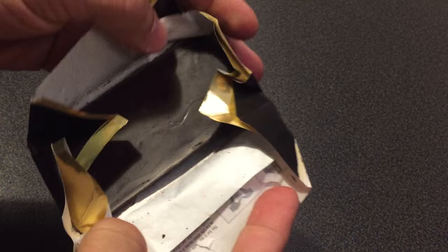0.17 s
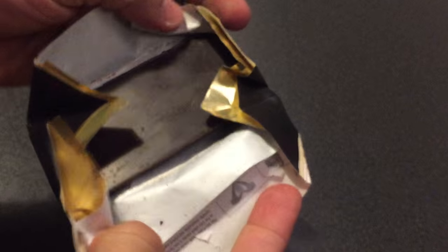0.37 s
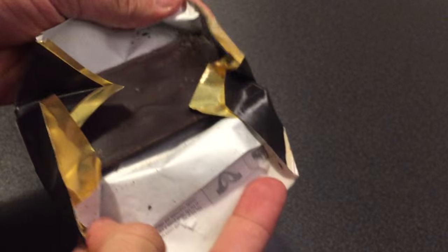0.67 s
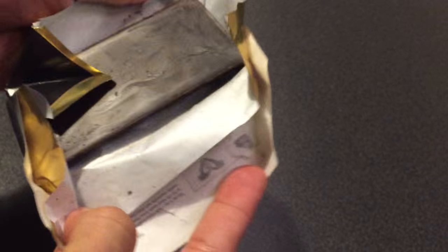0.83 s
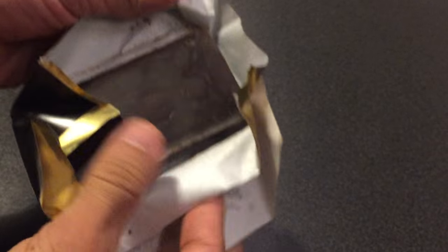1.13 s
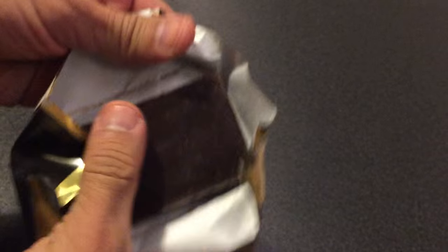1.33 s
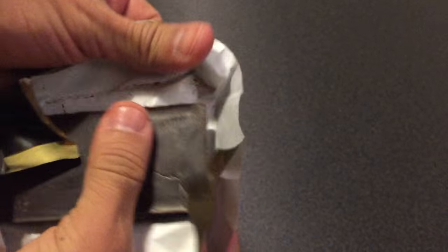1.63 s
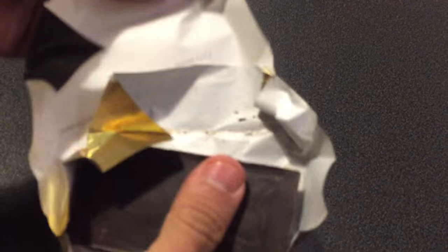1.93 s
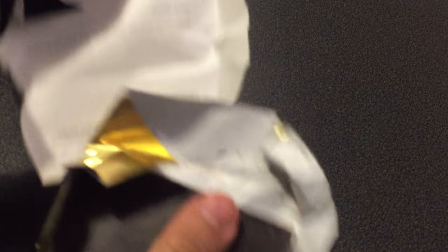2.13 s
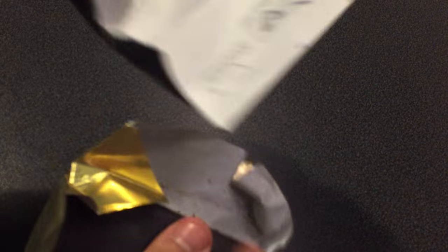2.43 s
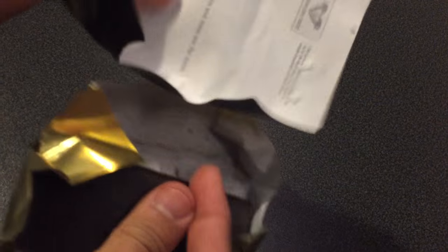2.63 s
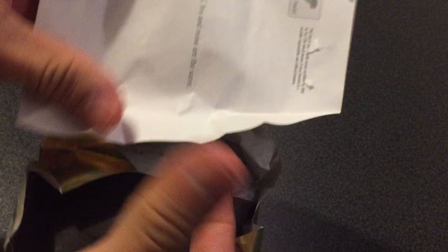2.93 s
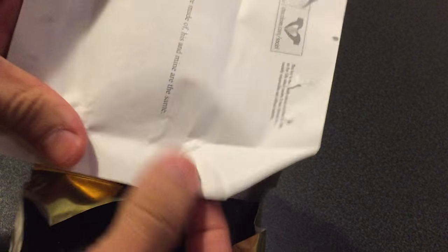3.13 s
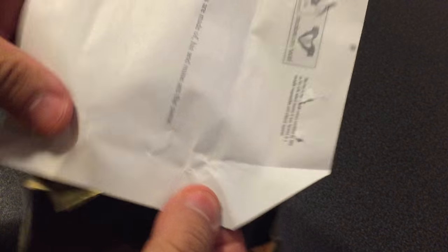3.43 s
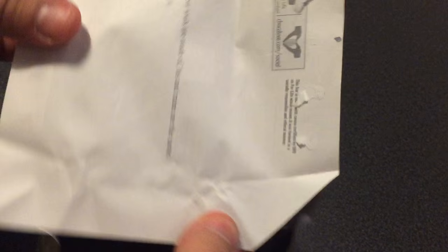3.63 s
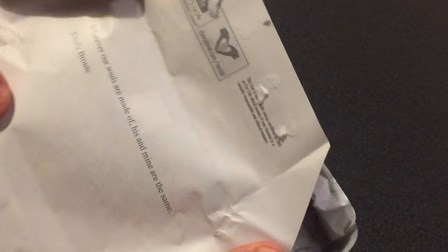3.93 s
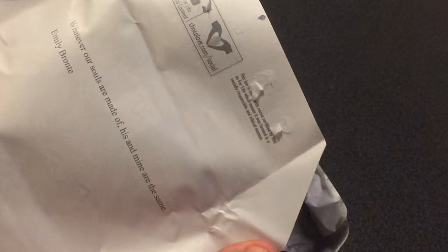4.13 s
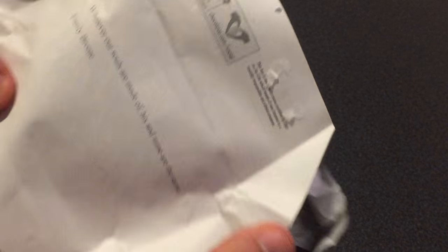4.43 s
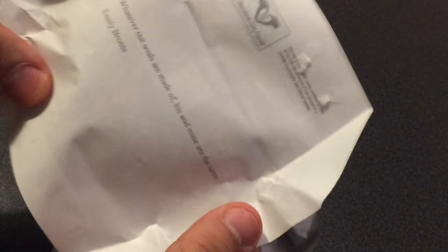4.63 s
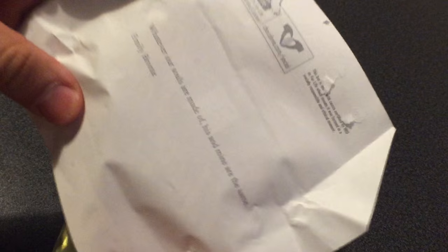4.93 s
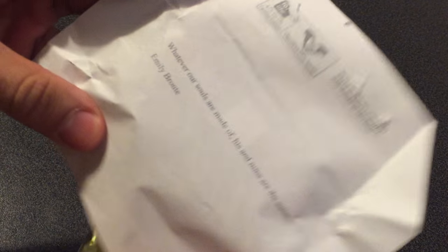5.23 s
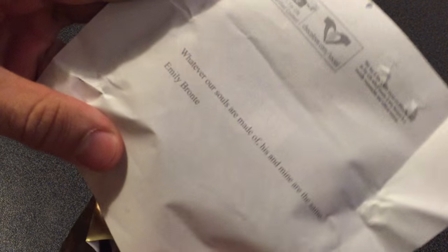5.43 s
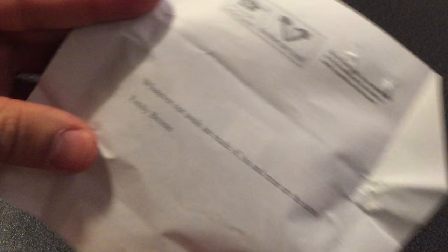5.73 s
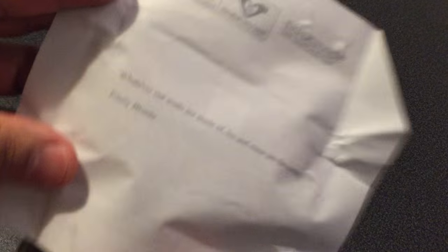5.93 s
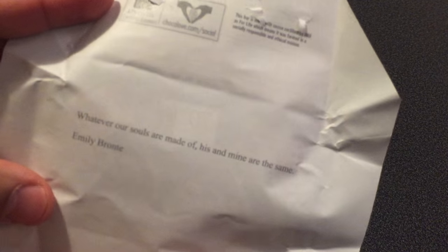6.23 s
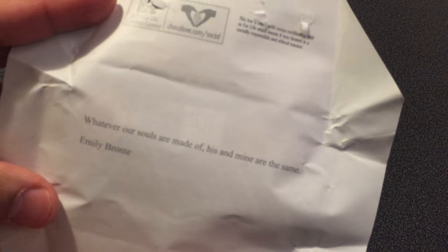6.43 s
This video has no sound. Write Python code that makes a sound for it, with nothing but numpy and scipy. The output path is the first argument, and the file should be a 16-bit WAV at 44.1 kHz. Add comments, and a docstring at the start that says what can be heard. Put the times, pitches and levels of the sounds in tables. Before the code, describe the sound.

Foil and paper wrapper crackles sharply and busily close up over a low appliance hum, which stops before the final sparse crinkles.

```python
"""Unwrapping a chocolate bar

Hands unfold a foil and paper wrapper close to a microphone in a small room. Buckling creases snap as
short band-passed noise bursts over a rustle of random cracks shaped by the strokes of the hands, and
the flapping sheet gives decaying low sines. An appliance hums, a wavering sine over filtered noise,
until it switches off; a low rumble then sinks away. Faint steady noise fills the room throughout."""
import sys
import numpy as np
from scipy import signal
from scipy.fft import rfft, irfft, next_fast_len
from scipy.io import wavfile

SR = 44100
rng = np.random.default_rng(int(sys.argv[2]) if len(sys.argv) > 2 else 0)


def pcm_store(signal):
    """Save signal as 16-bit PCM."""
    levels = np.round(np.clip(np.atleast_2d(signal), -1, 1) * 32767)
    wavfile.write(sys.argv[1], SR, levels.astype(np.int16).T)


N = 290619  # samples
OFF_S = 4.72  # the appliance is silent from here
EDGE_HZ = 15350  # upper limit of the treble

# creases that buckle: start_s, ring_peak_db, low_ring_hz, high_ring_hz, low_ring_db and high_ring_db
# (re the broad ring), treble_db (re the ring peak), t60_s
CREASE_SNAPS = [(0.022, -29.5, 1160, 2850, 4, -15, -8, 0.024), (0.051, -21, 1060, 3020, 4, 0, -21, 0.022),
                (0.096, -29, 1430, 2690, 11, 3, -9, 0.02), (0.114, -14.5, 1580, 3030, -15, -16, -2, 0.018),
                (0.164, -17, 1610, 2530, 0.5, -11, -4, 0.022), (0.213, -17.5, 1980, 3040, 7, 0, -34, 0.027),
                (0.238, -25.5, 1570, 2730, -23, -8, -14, 0.017),
                (0.244, -26, 1110, 2780, -2, -3, -16, 0.023), (0.273, -25, 1480, 2550, 5, 5, -14, 0.022),
                (0.281, -18, 1070, 2560, -5.5, -19, -28, 0.028),
                (0.352, -19.5, 1500, 3180, -8, -14, -2, 0.026), (0.38, -25, 1020, 2770, 1, -3, -23, 0.023),
                (0.426, -13, 1560, 3200, -4.5, -2, -19, 0.016),
                (0.476, -22.5, 1560, 6900, -34, 0, 5, 0.024),
                (0.504, -28.5, 1140, 5440, -17, -6, -18, 0.025),
                (0.586, -21.5, 2090, 3140, -9, -12, -18, 0.017), (0.621, -30, 1080, 2670, 8, 1, -19, 0.025),
                (0.747, -26.5, 1200, 2610, -7, -8, 10, 0.015),
                (0.754, -17.5, 1490, 4560, -19, -22, -23, 0.0086),
                (0.817, -15.5, 1670, 3440, -12, -18, -5, 0.016),
                (0.855, -10.5, 1430, 2530, -12, -21, -17, 0.018), (0.87, -12, 1280, 4010, 1, -8, -15, 0.02),
                (0.88, -14.5, 2280, 2410, 2, -4, -23, 0.025),
                (0.942, -9.5, 970, 4660, -7.5, -27, -5, 0.023),
                (0.956, -0.5, 1570, 6040, -23, -9, -1.5, 0.023),
                (1.007, -10.5, 1120, 5740, -12, -8, -2, 0.015),
                (1.076, -23.5, 680, 2970, -9.5, -7, -17, 0.031),
                (1.199, -14.5, 1450, 2530, 6, 6, -26, 0.024), (1.27, -33, 694, 4620, -10, -6, 10, 0.041),
                (1.295, -2, 750, 3950, -18.5, -10.5, -7, 0.022),
                (1.395, -13, 1090, 3300, 5.5, 2, -24, 0.04), (1.465, -26.5, 1190, 2990, 5, -17, -11, 0.025),
                (1.482, -19.5, 1410, 3230, 1, -10, -12, 0.029),
                (1.561, -26, 1570, 2550, -10, -1, -15, 0.026),
                (1.607, -26.5, 1350, 2420, 11, 0, -17, 0.024),
                (1.705, -24.5, 2240, 2320, -4, -12, -14, 0.031),
                (1.727, -14, 660, 2720, -10.5, -18, 0, 0.017), (1.757, -20, 1910, 2920, -6, -7, -9, 0.029),
                (1.778, -25, 2300, 2460, -6, -6, -17, 0.02), (1.807, -28, 1460, 3520, 1, -11, -18, 0.018),
                (1.837, -23, 1500, 5710, -16, -4, -16, 0.021),
                (1.859, -18.5, 1100, 2990, -8, -18, -17, 0.048),
                (1.91, -17.5, 2300, 2410, -9, -6, -12, 0.014), (1.932, -20, 1400, 3250, -7, -4, -16, 0.022),
                (2.016, -23, 2350, 2400, -8, -10, -20, 0.034), (2.103, -22.5, 1090, 2360, 6, 4, -19, 0.015),
                (2.11, -27, 1300, 2360, 2, -3, -19, 0.024), (2.156, -29, 1500, 4120, -12, 6, -13, 0.017),
                (2.27, -31, 1160, 2780, -1, -10, -17, 0.018), (2.295, -24, 1180, 2690, 2, 1, -16, 0.026),
                (2.327, -17, 1520, 2360, -10, -12, -18, 0.022),
                (2.349, -19.5, 1170, 2930, -7, -16, -19, 0.026), (2.397, -18, 1040, 3040, -7, -6, 1, 0.028),
                (2.477, -19.5, 1130, 3950, 0, 1, -13, 0.03), (2.562, -23.5, 1030, 2950, 4, -5, -9, 0.018),
                (2.574, -18, 1940, 2690, -6, -11, -14, 0.026), (2.583, -17, 1070, 2380, -7, -7, -12, 0.017),
                (2.618, -8.5, 1890, 4230, -13, -4.5, -22, 0.015),
                (2.651, -25, 2300, 3070, -1, -4, -17, 0.018), (2.672, -22, 1480, 2630, 5, 11, -14, 0.035),
                (2.696, -19.5, 970, 2460, -5.5, -4, -17, 0.018),
                (2.773, -16.5, 1480, 2310, 4.5, 0, -16, 0.01),
                (2.782, -19, 2270, 2390, -0.5, 3, -22, 0.016), (2.811, -16, 2130, 5070, -11, 2, -9, 0.013),
                (2.957, -15, 1830, 2850, -12, -12, -4, 0.022), (3.004, -29, 1810, 6150, 4, -2, -14, 0.025),
                (3.039, -25.5, 1080, 3730, -4, -6, -15, 0.034),
                (3.087, -14, 1030, 2500, -5.5, -12, -6, 0.025),
                (3.149, -29, 1120, 3900, -14, -6, -14, 0.02),
                (3.241, -18.5, 1740, 3200, -4, -6, -16, 0.014),
                (3.247, -15.5, 1100, 3240, -5.5, -14, -12, 0.016),
                (3.266, -8.5, 1090, 3140, -10, -35, -5, 0.013),
                (3.289, -20.5, 2100, 2330, 2, 6, -25, 0.016), (3.41, -11, 1750, 2900, 3.5, 1, -34, 0.023),
                (3.455, -22.5, 2130, 3080, 8.5, 6, -19, 0.025), (3.486, -32, 694, 2760, 8, -2, -21, 0.016),
                (3.519, -24, 1640, 2360, -9, -13, -7, 0.033),
                (3.556, -15, 1730, 3900, -6.5, -16, -2.5, 0.027),
                (3.587, -20, 2000, 3020, -1, -1, -5, 0.026), (3.613, -30, 1530, 5770, 10, -14, -18, 0.022),
                (3.779, -22.5, 1140, 2540, 5, -2, -12, 0.02), (3.804, -20.5, 1550, 2880, 4, 6, -13, 0.017),
                (3.832, -12, 1580, 2860, 3, -1, -14, 0.018), (3.849, -14.5, 720, 6100, -21, -1, 2.5, 0.015),
                (3.921, -11, 1950, 3250, -5, -15, -8, 0.02),
                (3.996, -9.5, 1550, 2560, -15.5, -11, -18, 0.024),
                (4.121, -27, 1070, 2830, 4, -2, -6, 0.06), (4.14, -0.5, 1770, 5000, -13, -5, -4.5, 0.015),
                (4.359, -41.5, 1990, 2690, 0, -17, -17, 0.02), (4.379, -47, 604, 2730, -6, -7, -5, 0.022),
                (4.424, -37.5, 970, 2350, 8, 0, -26, 0.023), (4.522, -33, 2000, 3300, 9, -6, -15, 0.017),
                (4.605, -36, 710, 2760, 5, 0, -23, 0.02), (4.638, -21, 1830, 2600, 6.5, -1, -15, 0.038),
                (4.68, -32, 1400, 6600, -11, -12, -9, 0.031),
                (4.693, -9.5, 1520, 2620, 5.5, -12, -19, 0.016),
                (4.761, -35.5, 1690, 2360, -4, 3, -20, 0.027),
                (4.916, -27.5, 1740, 2640, -8, 2, -25, 0.043),
                (4.953, -31.5, 2270, 2710, -7, 5, -17, 0.031),
                (4.981, -16.5, 1570, 3170, 6.5, 8, -20, 0.023),
                (5.0, -17.5, 840, 2840, 12, 7, -20.5, 0.025),
                (5.011, 5.5, 1850, 3630, -16.5, -8.5, -6, 0.014),
                (5.091, -25, 1040, 2470, 4, 2, -16, 0.013), (5.108, -24, 1940, 2590, 9, -3, -22, 0.018),
                (5.116, -27.5, 1950, 2700, 18, -4, -27, 0.029), (5.126, -36, 2000, 3980, 3, -4, -31, 0.023),
                (5.223, -31.5, 616, 2580, 5, 4, -22.5, 0.025), (5.28, -25, 610, 5060, -11, -1, 0, 0.016),
                (5.308, -28.5, 1700, 2670, -11, -3, -17.5, 0.029),
                (5.353, -33, 1570, 2870, -12, 2, -16, 0.025), (5.652, -38, 1770, 2410, 12, -10, -18, 0.037),
                (5.673, -29, 890, 2600, -2, -9, -14, 0.022), (5.687, -22, 587, 4560, -14, -3, -12, 0.022),
                (5.754, -25, 1730, 2630, -1, -8, -8, 0.022), (5.832, -40, 1450, 3500, -1, -4, -20, 0.029),
                (5.862, -40, 616, 2410, -4, -3, -21, 0.043), (5.871, -38, 1560, 2640, 6, -1, -19, 0.029),
                (5.928, -37, 1540, 2440, 3, -14, -13.5, 0.023), (6.041, -31, 685, 2470, 11, -6, -11, 0.035),
                (6.076, -12.5, 1940, 2780, 7, 9, -13, 0.016), (6.092, -10, 1780, 2570, -3, -7, -4.5, 0.012),
                (6.156, -10.5, 1610, 2130, 9.5, -13, -22, 0.019),
                (6.272, -36.5, 654, 2550, 5, 0, -26, 0.022),
                (6.285, -33.5, 1580, 2900, 2.5, -2, -19.5, 0.023),
                (6.317, -49, 596, 2550, 11, -4, -23.5, 0.016), (6.335, -45, 1360, 2640, 9, 1, -22.5, 0.017)]


def gain_of(db):
    """Decibel law: amplitude ratio of a level in dB."""
    return 10 ** (np.asarray(db) / 20)


def evened(x):
    """Power normalisation: scales to rms 1."""
    return x / np.sqrt(np.mean(x ** 2) + 1e-20)


def read(points, hz):
    """Interpolation over log frequency, on which hearing spaces pitch."""
    f, value = np.transpose(points)
    return np.interp(np.log(hz + 1), np.log(f + 1), value)


def add(mix, s, sound):
    """Superposition: adds a sound into the mix from s seconds on."""
    part = mix[round(s * SR):][:len(sound)]
    part += sound[:len(part)]


def coloured(x, spectrum):
    """Linear filtering: weights the frequencies of x by a table of gains, then sets rms 1."""
    size = next_fast_len(len(x))
    gain = gain_of(read(spectrum, np.fft.rfftfreq(size, 1 / SR)))
    return evened(irfft(rfft(x, size) * gain, size)[:len(x)])


def band(x, lo_hz, hi_hz):
    """Resonance as a causal band-pass, scaled to peak 1."""
    y = signal.lfilter(*signal.butter(2, [lo_hz, min(hi_hz, SR / 2 - 100)], "band", fs=SR), x)
    return y / abs(y).max()


def drift(cutoff_hz):
    """Low-passed noise: a slow random wander of rms 1."""
    return evened(signal.lfilter(*signal.butter(1, cutoff_hz, fs=SR), rng.standard_normal(N)))


def grains(per_s, spread_db, t60, clump_db):
    """Shot noise: tiny random cracks, a few of them large, arriving in clumps."""
    happens = rng.random(N) < per_s / SR
    size = gain_of(spread_db * np.minimum(rng.exponential(1, N), 5)) * happens
    clumped = size * gain_of(clump_db * drift(8.1))
    power_decay = gain_of(-2 * 60 * np.arange(600) / SR / t60)
    power = signal.oaconvolve(clumped ** 2, power_decay)[:N]
    return np.sqrt(abs(power)) * rng.standard_normal(N)


def creases():
    """Sums of incoherent cracks: those of the whole sheet, and of small patches each in its own band."""
    whole = grains(per_s=900, spread_db=3.8, t60=.007, clump_db=1.5)
    patches = np.zeros(N)
    for hz in 700 * 1.312 ** np.arange(9):
        cracks = grains(per_s=230, spread_db=3.0, t60=0.047, clump_db=3.0)
        patches += np.sqrt(hz) * evened(band(cracks, hz / 1.174, hz * 1.34))
    return evened(whole) + 0.92 * evened(patches)


def handling(offset_db, brightness_share, bending=0):
    """Power addition: one rustle layer's amplitude from the held sheet, strokes and crackle after snaps."""
    # strokes of the hands: strongest_s, level_db, brightness_db, extra_bending_db, rise_s, fall_s
    strokes = [(.01, -41, 4, -4, 0.063, 0.14), (.231, -42.5, 1, -3, 0.038, 0.11),
               (.38, -57, 1, 13, 0.053, 0.08), (.6, -49, 0.5, -12, 0.48, 0.31),
               (.78, -44.5, 4, -3.5, 0.094, 0.17), (0.871, -31, -7, 0, 0.12, 0.084),
               (1.05, -57.5, 5, 13, 0.078, 0.41), (1.208, -39, -19, 1, 0.029, 0.046),
               (1.375, -44.5, -3, 4, 0.084, 0.16), (1.473, -36, 0, -7, 0.2, 0.037),
               (1.622, -41, -2.5, -11, 0.26, 0.22), (1.925, -35, 6, -1, 0.25, 0.14),
               (2.027, -36.5, 5.5, 2, 0.083, 0.031), (2.12, -49.5, 6, 0, .06, 0.31),
               (2.276, -37, -2.5, 1.5, 0.51, .2), (2.356, -38.5, 5.5, 2, 0.087, 0.16),
               (2.478, -37.5, -4, 1, 0.073, 0.052), (2.584, -43, -0.5, -0.5, 0.1, 0.43),
               (2.792, -44, -1, 0, 0.16, 0.17), (2.957, -44.5, 1.5, 7.5, 0.064, 0.081),
               (3.095, -44.5, 7.5, 5, 0.21, 0.12), (3.172, -47, 4.5, 13, 0.044, 0.069),
               (3.29, -34.5, -7.5, 3, 0.084, 0.086), (3.43, -49, -18, 10, .02, .15),
               (3.571, -41, 3, 7.5, 0.087, 0.087), (3.834, -39.5, 0, 5.5, 0.32, 0.11),
               (4.01, -36.5, -23, 0, 0.03, 0.086), (4.13, -40.5, -10, 14.5, 0.046, 0.026),
               (4.432, -59, -8, 8, 0.11, 0.087), (4.526, -41.5, -18, -14, 0.033, 0.15),
               (4.55, -42, 0, -9, 0.042, 0.095), (4.62, -54, 2, 12.5, .07, 0.08),
               (4.7, -41, -11, -15, .015, 0.079), (4.729, -36.5, -1, 1, 0.069, 0.021),
               (4.78, -52.5, -19.5, -13, 0.054, .15), (4.89, -55.5, 1.5, -8, 0.17, .06),
               (4.96, -52, -2.5, -3, 0.053, .08), (5.12, -44, -12, -8, 0.053, 0.14),
               (5.316, -48, -1.5, 5.5, .12, 0.077), (5.392, -51.5, 6, 3, .1, 0.045),
               (5.705, -41.5, 3.5, 0, 0.096, 0.075), (5.755, -40.5, -3.5, 1.5, 0.076, 0.071),
               (5.966, -66, 11.5, 8, 0.054, 0.2), (6.085, -38.5, -8.5, -1.5, 0.057, .1),
               (6.443, -54.5, -19.5, -10, 0.4, 0.16)]
    # quiet rustle while the wrapper is only held: time_s, level_db, brightness_db
    held = [(0, -55, -22), (.7, -56, -10), (1.1, -56, 7), (1.26, -56.5, 5), (1.5, -48, 1), (2.4, -57.5, -5),
            (2.9, -59, 8), (3.22, -48, -15), (3.65, -50.5, -10), (4.05, -51, 3), (4.3, -81, -6),
            (4.5, -65, -4), (4.8, -60, -12), (5.001, -57, -4), (5.3, -64, -9), (5.45, -67.5, 1),
            (5.9, -62.5, -5), (6.3, -54, -21), (6.59, -76, -1)]
    drop_db, roundness = -30, 1.126  # level at both ends of a stroke; over 1 = a rounded top
    hold_bend_db, after_bend_db = 0.5, -2.5
    after_db, after_db_per_s, after_share = -35, -170, 0.34  # brighter after a bright snap

    t = np.arange(0, N + 64, 64) / SR
    held_s, held_db, held_bright_db = np.transpose(held)
    level = held_db + brightness_share * held_bright_db + bending * hold_bend_db
    power = gain_of(2 * np.interp(t, held_s, level))
    for s, db, bright_db, bend_db, rise, fall in strokes:
        away = np.where(t < s, (s - t) / rise, (t - s) / fall)
        level = db + brightness_share * bright_db + bending * bend_db + drop_db * away ** roundness
        power = power + gain_of(2 * level)
    for s, db, *_, treble_db, _ in CREASE_SNAPS:
        level = db + after_db + bending * after_bend_db + brightness_share * after_share * treble_db
        power = power + (t > s) * gain_of(2 * (level + after_db_per_s * abs(t - s)))
    return gain_of(offset_db) * np.interp(np.arange(N) / SR, t, np.sqrt(power))


def rustle():
    """Friction and buckling: creases crackle in paper and foil, skin slides in a finer hiss, the sheet bends."""
    # spectra of crackling paper, crackling foil, sliding skin and the bending sheet: freq_hz, gain_db
    paper = [(410, -35.5), (700, -2), (973, 2.5), (1200, 5), (1340, -2), (1530, 5), (1900, 0.5),
             (2320, -12), (2600, -4), (3380, -54), (5720, -120)]
    foil = [(1240, -51), (2100, -2), (2360, -4.5), (3170, 0.5), (3440, -2.5), (4540, -2.5), (4940, -10),
            (7000, -8), (9100, -24), (15400, -120)]
    skin_on_sheet = [(3240, -45), (5500, 0), (7650, -5.5), (8480, -0.5), (10500, -4.5), (11200, -4),
                     (14600, -6), (15500, -11.5)]
    bending_sheet = [(82, -21), (140, -5), (280, -7), (400, -13.5), (615, -6), (788, -9), (900, -17.5),
                     (1170, -31.5), (1980, -120)]

    cracks = creases()
    slide = grains(per_s=2500, spread_db=1.8, t60=.004, clump_db=3.0)
    bend = grains(per_s=700, spread_db=2.2, t60=.03, clump_db=1.8)
    paper_crackle = handling(0, 0) * coloured(cracks, paper)
    foil_crackle = handling(0.11, 0.6) * coloured(cracks, foil)
    skin = handling(-2.5, 0.97) * coloured(evened(slide) + 0.062 * cracks, skin_on_sheet)
    bends = handling(-6, -0.067, bending=0.91) * coloured(bend, bending_sheet)
    return paper_crackle + foil_crackle + skin + bends


def appliance():
    """Rotation and forced vibration: a wavering motor tone stops just before its casing's rumble."""
    # mean level of the motor tone: time_s, level_db (rms)
    tone_levels = [(0, -46), (.6, -43.5), (1.2, -50.5), (2.2, -44.5), (2.34, -51.5), (2.8, -41), (3.3, -48),
                   (3.79, -41), (4.1, -53), (4.39, -43.5), (4.57, -53)]
    # spectrum of the casing: freq_hz, gain_db
    casing = [(15, -55.5), (25, -19), (59, -16.5), (108, -0.5), (128, -7), (151, -18), (182, -11),
              (209, -25.5), (243, -14), (292, -25), (317, -29), (356, -19), (400, -43), (520, -65),
              (880, -120)]
    motor_hz, rumble_db, tone_lead_s = 117.4, -43.5, 0.13  # mean pitch; the tone stops this much earlier

    t = np.arange(N) / SR
    turns = np.cumsum(motor_hz + 2.9 * drift(4.1)) / SR
    tone_db = np.interp(t, *np.transpose(tone_levels)) + 0.83 * drift(8.7)
    tone = np.sqrt(2) * gain_of(tone_db) * np.sin(2 * np.pi * turns)
    rumble = gain_of(rumble_db) * coloured(rng.standard_normal(N), casing)
    return (t < OFF_S - tone_lead_s) * tone + np.clip((OFF_S - t) / 0.09, 0, 1) * rumble


def background():
    """Stationary noise: the steady quiet of the room, white noise through a fixed spectrum."""
    # spectrum of the quiet: freq_hz, gain_db
    quiet = [(15, -39), (25, -7), (111, 13), (285, 5.5), (354, 9.5), (476, -3.5), (531, -37), (1160, -38.5),
             (1440, 5.5), (1610, -11.5), (6380, -22.5), (13600, -46), (16000, -49)]
    return gain_of(-62.5) * coloured(rng.standard_normal(N), quiet)


def room(x):
    """Reverberation: sparse taps of random sign after the first wall echo, decaying by frequency."""
    # decay time of the room: freq_hz, t60_s
    decay_times = [(250, 0.22), (1000, 0.055), (4000, 0.17), (12000, 0.18)]
    taps = np.zeros(SR // 2)
    at = np.arange(350, len(taps) - 20, 12)
    taps[at + rng.integers(0, 12, len(at))] = rng.choice([-1., 1.], len(at))
    hz, t, z = signal.stft(taps, SR, nperseg=256)
    decay = gain_of(-60 * t / read(decay_times, hz)[:, None])
    tail = signal.istft(z * decay, SR, nperseg=256)[1]
    return signal.fftconvolve(x, tail / np.linalg.norm(tail))[:N]


def snaps():
    """Impulse excitation: a tick and rattle ring two patches of sheet, with a duller body and brighter edge."""
    edge_t60 = 0.041  # s, extra decay of the treble
    body_db, body_share = -16.5, 0.67  # the body follows the low ring in part
    out, t = np.zeros(N), np.arange(1500) / SR
    for row in CREASE_SNAPS:
        s, db, low_hz, high_hz, low_db, high_db, treble_db, t60 = row
        noise = rng.standard_normal(len(t))
        rattle = gain_of(-60 * t / t60)
        tick = 0.27 * gain_of(-60 * t / 0.0042)
        burst = noise * np.minimum(t / 0.000067, 1) * (rattle + tick)
        ring = gain_of(low_db) * band(burst, low_hz / 1.21, low_hz * 1.267)
        ring = ring + gain_of(high_db) * band(burst, high_hz / 1.207, high_hz * 1.21)
        ring = ring + band(burst, 1200, 6700)  # broad ring
        body = gain_of(body_db + body_share * low_db) * band(burst, 400, 900)
        edge = gain_of(treble_db) * band(burst * gain_of(-60 * t / edge_t60), 4900, EDGE_HZ)
        add(out, s, gain_of(db) * (ring / abs(ring).max() + body + edge))
    return out


def flaps():
    """Damped oscillation: each pop of the sheet pushes air in a decaying low sine."""
    # low pushes of air as the sheet pops over: start_s, peak_db, pitch_hz, t60_s (at least 0.01 is used)
    pops = [(1.401, -28, 217, 0.018), (3.043, -29.5, 206, 0.054), (3.178, -32.5, 204, 0.027),
            (3.251, -32.5, 305, 0.05), (3.826, -33, 413, 0.052), (4.142, -27, 308, 0.022),
            (4.731, -19.5, 180, 0.017), (4.999, -24, 302, 0.017), (5.013, -24, 348, 0.052),
            (5.015, -34.5, 85, 0.035), (5.669, -35, 325, 0.0071), (5.745, -41, 264, 0.11),
            (5.773, -40, 149, 0.021), (5.799, -37, 98, 0.056), (6.158, -34, 99, 0.059)]
    out, t = np.zeros(N), np.arange(6000) / SR
    for s, db, hz, t60 in pops:
        envelope = np.minimum(t / 0.0035, 1) * gain_of(-60 * t / max(t60, .01))
        swing = -np.sin(2 * np.pi * hz * t) * envelope
        add(out, s, gain_of(db) * swing / abs(swing).max())
    return out


def house():
    """Exponential decay: a low rumble sinks to a floor once the hum has stopped."""
    # spectrum of the low rumble: freq_hz, gain_db
    deep = [(15, -54.5), (25, -23.5), (70, -13), (101, -5), (140, -13.5), (182, -11), (199, 4),
            (220, -13.5), (290, -34), (480, -120)]
    start_db, slope_db_per_s, floor_db = -53, -23.5, -70
    since = np.arange(N) / SR - OFF_S
    sinking = gain_of(np.maximum(start_db + slope_db_per_s * since, floor_db))
    return np.clip(since / .05, 0, 1) * sinking * coloured(rng.standard_normal(N), deep)


def scene():
    """Superposition of the near wrapper, its echo, the hum, the low rumble and the quiet of the room."""
    wrapper = rustle() + snaps() + flaps()
    echo = gain_of(-12.0) * room(wrapper)
    return (wrapper + echo + appliance() + house() + background())[None]


def record(dry):
    """Transducer limits: a small microphone loses deep bass, clips the loudest peaks and limits the treble."""
    full = 0.9  # clipping amplitude
    thin = signal.lfilter(*signal.butter(2, 55, "high", fs=SR), dry)
    low_pass = signal.firwin(255, EDGE_HZ, window=("kaiser", 9), fs=SR)
    return signal.oaconvolve(np.clip(thin, -full, full), low_pass[None], "same")


dry = scene()
out = record(dry)
pcm_store(out)
```